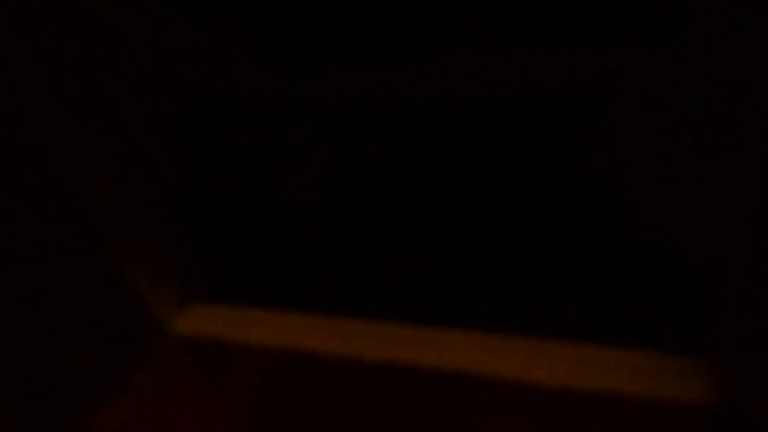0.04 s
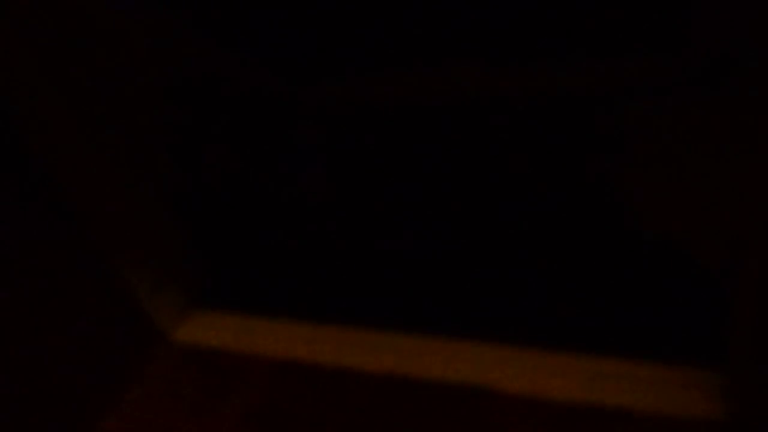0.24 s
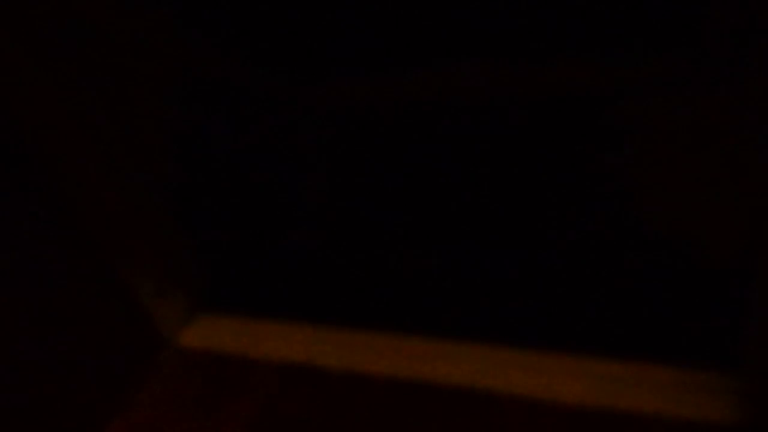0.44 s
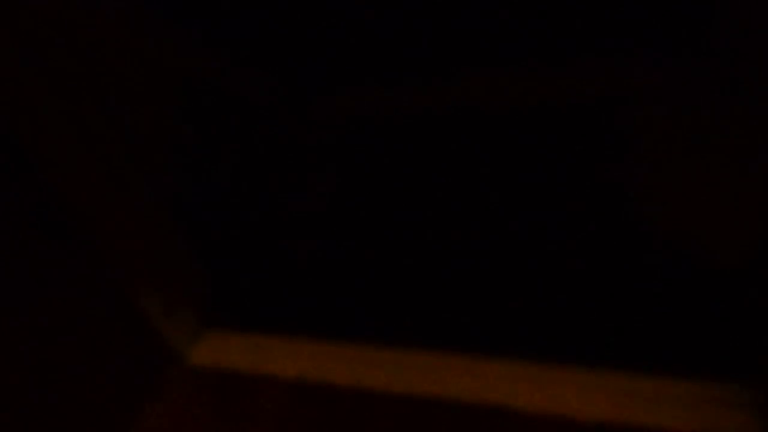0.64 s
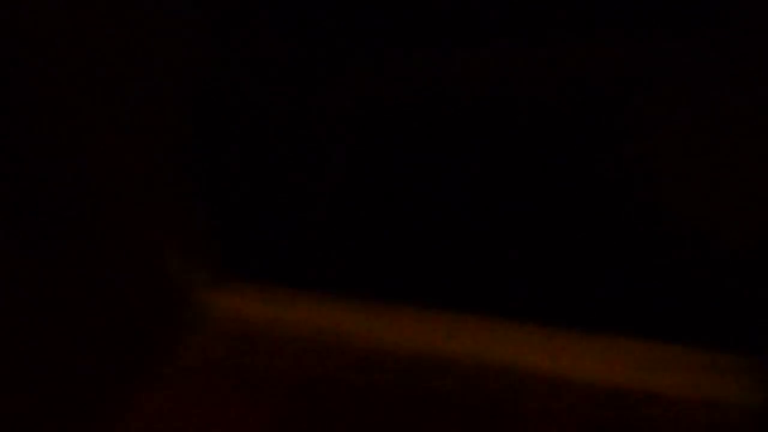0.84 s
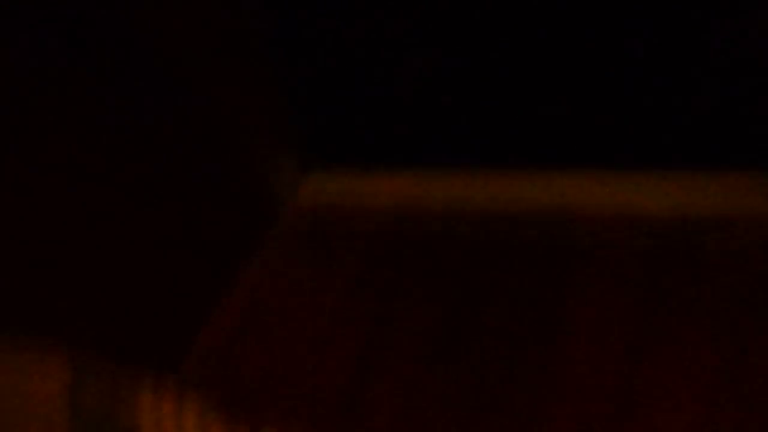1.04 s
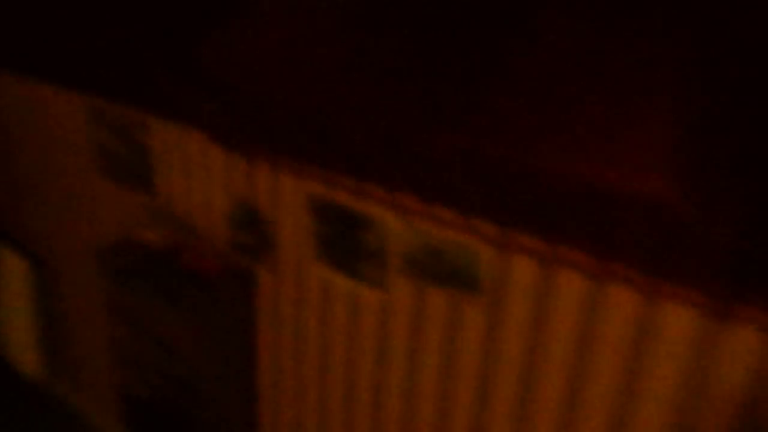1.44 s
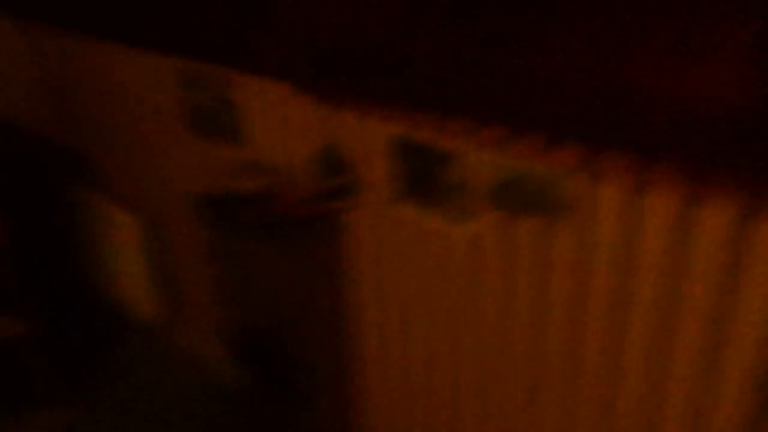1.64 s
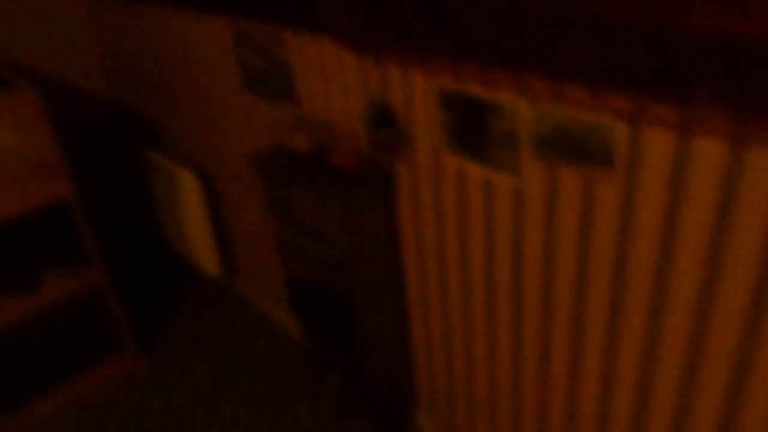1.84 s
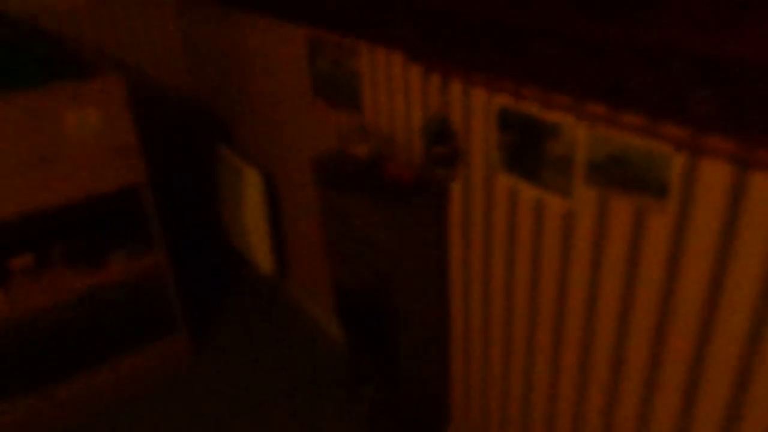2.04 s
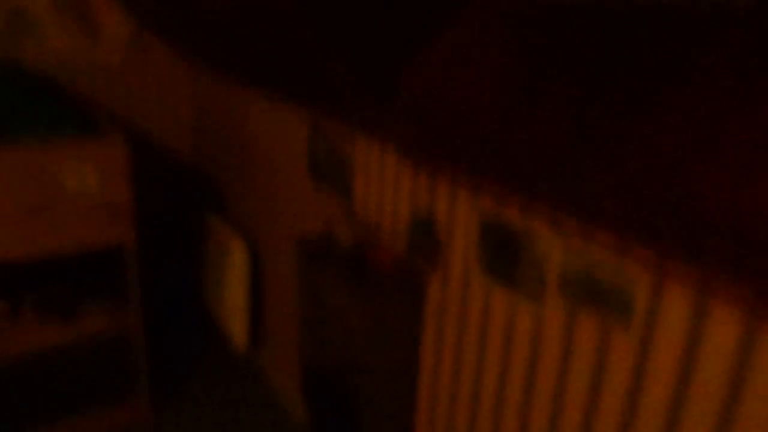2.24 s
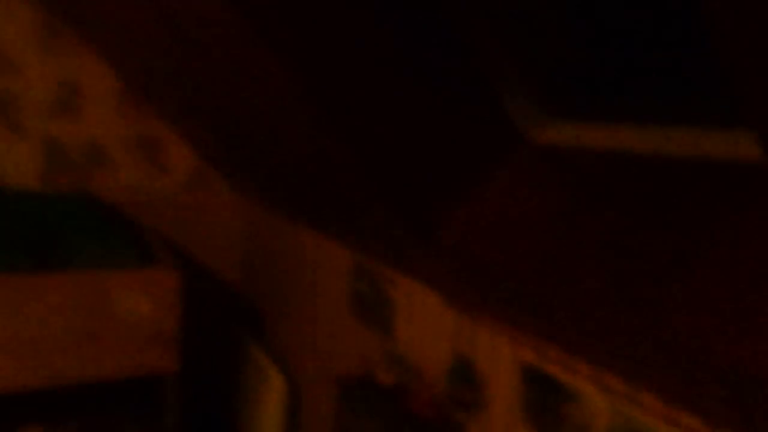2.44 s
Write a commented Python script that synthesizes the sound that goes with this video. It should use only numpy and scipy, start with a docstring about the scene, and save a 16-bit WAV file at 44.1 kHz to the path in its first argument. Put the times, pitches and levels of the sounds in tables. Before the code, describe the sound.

A window scrapes, rumbles and bangs shut, cutting off the hail and rain outside. In the small room a metal catch ticks, the wooden frame knocks, and soft handling thumps and three hollow clacks follow as the muffled storm swells.

```python
"""Hail and rain roar outside an open window: a bed of noise peppered with tiny damped pings.
The sash scrapes and rumbles as friction shakes it, then bangs shut; pane and small room ring out.
The storm drops to a hush, in which the metal catch ticks and the wooden frame knocks.
Soft handling thumps and three hollow clacks follow, with single hailstones standing out,
while the storm's noise swells again."""
import sys
import numpy as np
from scipy import signal
from scipy.fft import rfft, irfft, next_fast_len
from scipy.io import wavfile
from scipy.ndimage import uniform_filter1d, map_coordinates

SR = 44100
rng = np.random.default_rng(int(sys.argv[2]) if len(sys.argv) > 2 else 0)


def to_wav(s):
    """Save 16-bit WAV."""
    ch = np.atleast_2d(s).T  # columns
    pcm = np.round(np.clip(ch, -1, 1) * 32767)  # PCM
    wavfile.write(sys.argv[1], SR, pcm.astype(np.int16))


N = 110250
SHUT_S = 0.5792  # the sash hits home


def amp(db):
    """Decibels to gain."""
    return 10 ** (np.asarray(db) / 20)


def unit(x):
    """Scale to rms 1."""
    return x / np.sqrt(np.mean(x ** 2) + 1e-20)


def along(points, hz):
    """Read a (freq_hz, value) curve on a log frequency axis."""
    freqs, values = np.transpose(points)
    return np.interp(np.log(hz + 1), np.log(freqs + 1), values)


def fader(points):
    """Gain per sample from (time_s, level_db) points."""
    return amp(np.interp(np.arange(N) / SR, *np.transpose(points)))


def since(start_s):
    """Seconds since a moment, zero before it."""
    return np.maximum(np.arange(N) / SR - start_s, 0)


def strike(start_s, t60_s, rise_s=0.00044):
    """Envelope of a hit: quick attack, exponential decay."""
    t = since(start_s)
    return (1 - np.exp(-t / rise_s)) * amp(-60 * t / t60_s)


def filtered(x, response):
    """Filter x by a gain that depends on frequency."""
    size = next_fast_len(N + SR // 4)
    return irfft(rfft(x, size) * response(np.fft.rfftfreq(size, 1 / SR)), size)[:N]


def equalised(x, colour):
    """Shape x with a (freq_hz, gain_db) curve."""
    return filtered(x, lambda f: amp(along(colour, f)))


def noise(colour):
    """Coloured noise of rms 1."""
    return unit(equalised(rng.standard_normal(N), colour))


def ring(modes, start_s, rise_s, wander_hz=0):
    """Struck, decaying modes; any pitch wander roughens them."""
    out = np.zeros(N)
    for hz, db, t60_s in modes:
        envelope = amp(db + rng.normal(0, 1)) * strike(start_s, t60_s, rise_s)
        detune_hz = wander_hz * unit(uniform_filter1d(rng.standard_normal(N), size=200))
        cycles = hz * since(start_s) + np.cumsum(detune_hz) / SR + rng.random()
        out += envelope * np.sin(2 * np.pi * cycles)
    return out


# Decay of the small room: freq_hz, t60_s
ROOM_DECAY = [(100, 0.68), (300, .38), (1200, 0.41), (4000, 0.41), (8000, 0.31), (15000, 0.27)]


def in_room(x, wet_db):
    """Add the room's reflections, a noise tail that lasts longest in the bass."""
    hz, t, spectrum = signal.stft(rng.standard_normal(SR), SR, nperseg=256)
    decay = amp(-60 * t / along(ROOM_DECAY, hz)[:, None])
    tail = signal.istft(spectrum * decay, SR, nperseg=256)[1]
    tail *= 1 - np.exp(-np.arange(len(tail)) / SR / 0.0014)  # soft onset
    return x + amp(wet_db) * signal.fftconvolve(x, tail / np.linalg.norm(tail))[:N]


def tick(start_s, level_db, pitch_hz, half_width_hz, room_db):
    """A very short contact: one band of a noise burst, with its splash in the room."""
    envelope = strike(start_s, t60_s=0.0045)
    spectrum = rfft(envelope * rng.standard_normal(N))
    flattened = irfft(spectrum / np.hypot(np.abs(spectrum), np.abs(spectrum).mean() / 2), N)
    burst = filtered(flattened, lambda f: 1 / (1 + ((f - pitch_hz) / half_width_hz) ** 4))
    burst *= np.linalg.norm(envelope) / np.linalg.norm(burst)
    return in_room(amp(level_db) * burst, room_db)


# Room tone: freq_hz, gain_db
HUSH_COLOUR = [(30, -17), (150, -14.5), (600, -2), (2000, -10), (3000, -20), (4500, -20), (9000, -39),
               (15000, -62.5)]


def hush():
    """The room's faint, steady noise floor."""
    return amp(-67) * noise(HUSH_COLOUR)


# Roar of far rain: freq_hz, gain_db
RAIN_COLOUR = [(20, -30), (45, -19), (80, -11.5), (160, -2), (330, -2), (600, -1), (1100, -4), (2300, -9),
               (3000, -12.5), (5000, -19), (7200, -23), (8600, -28.5), (10300, -31), (12000, -35.5),
               (15500, -40)]


def rain(flurry_db=1.28, flurry_hz=750, flurry_s=0.05):
    """Far rain in flurries: the level drifts separately in each band."""
    hz, t, spectrum = signal.stft(noise(RAIN_COLOUR), SR, nperseg=512)
    grid = np.meshgrid(hz / flurry_hz, t / flurry_s, indexing="ij")
    flurries = map_coordinates(rng.standard_normal((256, 256)), grid, mode="mirror")
    return unit(signal.istft(spectrum * amp(flurry_db * flurries), SR, nperseg=512)[1][:N])


# Tone of the hail patter: freq_hz, gain_db
HAIL_COLOUR = [(20, -49), (150, -15.5), (400, 2), (7000, 1), (11000, -3), (15000, -21)]


def hail(per_s, centre_hz, ring_cycles=5.1, scatter_db=4, largest_db=16.5):
    """Stones of random size land at random, each ringing for a few damped cycles; rms 1."""
    when, size, pitch = rng.random((int(per_s * N / SR), 3)).T[:, :, None]
    hz = np.clip(centre_hz * np.sqrt(pitch / (1 - pitch)), 300, 10000)
    size_db = np.minimum(-scatter_db * np.log(1 - size), largest_db)
    t = np.arange(400) / SR
    pings = amp(size_db) * np.sin(2 * np.pi * hz * t) * amp(-60 * hz * t / ring_cycles)
    positions = (when * N).astype(int) + np.arange(len(t))
    patter = np.bincount(positions.ravel(), pings.ravel(), N)[:N]
    return unit(equalised(patter, HAIL_COLOUR))


# Fader ride of the storm as heard in the room: time_s, level_db
STORM_RIDE = [(0, -38), (.1, -35.5), (.25, -31.5), (.4, -30.5), (.5, -29.5), (.57, -30.5), (.66, -43),
              (.8, -65), (1.0, -70.5), (1.07, -65), (1.15, -67), (1.27, -59), (1.46, -55), (1.58, -59),
              (1.66, -55.5), (1.85, -53), (2.05, -49.5), (2.25, -47), (2.38, -43), (2.5, -44)]
# Close stones relative to the storm, lost in the hush: time_s, level_db
NEAR_HAIL_RIDE = [(.6, -20.5), (.75, -38), (1.7, -27), (2.1, -25)]
# Change of the storm's tone behind the shut window: freq_hz, gain_db
SHUT_COLOUR = [(80, -0.5), (300, 1), (600, -1), (1200, 1), (3500, -.5), (7500, 0.5), (10000, -0.5),
               (14000, -5)]


def storm(crossfade_s=0.1):
    """Rain, dense hail and a few near stones, quieter and a little duller once the window shuts."""
    dense = amp(-8.5) * hail(per_s=1800, centre_hz=1560)
    near = fader(NEAR_HAIL_RIDE) * hail(per_s=43, centre_hz=3900)
    outside = rain() + dense + near
    shut = np.minimum(since(SHUT_S) / crossfade_s, 1)
    return fader(STORM_RIDE) * ((1 - shut) * outside + shut * equalised(outside, SHUT_COLOUR))


# Spot hits of hail: start_s, level_db, pitch_hz, half_width_hz, room_db
HAILSTONE_HITS = [(1.098, -49, 2446, 499, 1), (1.478, -34, 1294, 702, -4), (1.649, -37.5, 1480, 700, 4),
                  (1.791, -39, 4000, 1200, -4), (1.937, -39, 4200, 700, -5.5), (2.088, -35, 4280, 707, -3),
                  (2.105, -47, 9400, 3000, -6), (2.181, -44, 9500, 2800, 2), (2.378, -38, 9000, 2000, -9)]


def hailstones():
    """Single stones strike sharply enough to stand out from the storm."""
    return sum(tick(*hit) for hit in HAILSTONE_HITS)


# Soft handling thumps: start_s, level_db
HAND_THUMPS = [(1.705, -48.5), (1.722, -28), (1.738, -32), (1.775, -34), (1.808, -33), (1.836, -32.5),
               (1.86, -35), (1.873, -35), (1.907, -36.5), (2.222, -33)]
# Fader ride of the hand's rumble: time_s, level_db
RUB_RIDE = [(1.12, -79.5), (1.19, -67), (1.33, -79), (1.47, -68), (1.55, -60.5), (1.62, -72), (1.69, -59),
            (1.725, -38), (1.76, -63.5), (1.81, -53), (1.87, -52), (1.93, -59), (2.04, -65), (2.1, -43),
            (2.15, -48.5), (2.23, -52.5), (2.3, -54.5), (2.5, -50.5)]
# Tone of that rumble: freq_hz, gain_db
RUB_COLOUR = [(20, -18.5), (50, -3), (110, -1.5), (210, 4), (330, -2), (600, -31), (1500, -48), (5000, -68)]


def handling(thump_hz=102.5):
    """A hand shifts on the microphone's body: a rolling rumble with soft low bumps in it."""
    pitches = thump_hz * np.exp(0.2 * rng.standard_normal(len(HAND_THUMPS)))
    bumps = np.zeros(N)
    for (s, db), hz in zip(HAND_THUMPS, pitches):
        envelope = amp(db) * strike(s, t60_s=0.028, rise_s=0.0017)
        bumps += envelope * 2 * np.cos(2 * np.pi * hz * since(s))
    return bumps + fader(RUB_RIDE) * noise(RUB_COLOUR)


# Three clacks, top note and grit relative to each: start_s, level_db, top_hz, top_db, grit_db
CLACK_HITS = [(1.9355, -33, 1990, -3.5, -6.5), (2.0267, -36, 1943, 1, -4), (2.1625, -36.5, 2185, 2, -5.5)]
# Their hollow body: pitch_hz, level_db, t60_s
CLACK_MODES = [(837, -14.5, 0.12), (980, -8, 0.08), (1319, -5, 0.05), (4190, -18, 0.044)]
# Tone of their grit: freq_hz, gain_db
GRIT_COLOUR = [(300, -34), (900, -3.5), (2100, -7), (2700, -19), (4600, -15), (6000, -21), (15000, -38)]


def clacks(t60_s=0.05, rise_s=0.0008):
    """Light hollow contacts: a shared body, a top note of their own and some grit."""
    taps, grit_envelope = np.zeros((2, N))
    for s, db, top_hz, top_db, grit_db in CLACK_HITS:
        taps += amp(db) * ring(CLACK_MODES + [(top_hz, top_db, t60_s)], s, rise_s)
        grit_envelope += amp(db + grit_db) * strike(s, t60_s, rise_s)
    return taps + grit_envelope * noise(GRIT_COLOUR)


# Chatter of contacts within the knock: start_s, level_db
KNOCK_HITS = [(1.335, -34.5), (1.338, -28), (1.344, -34), (1.3494, -35.5), (1.364, -40.5)]
# Tone of the thud: freq_hz, gain_db
THUD_COLOUR = [(60, -30), (300, -12), (700, -22), (1050, 5.5), (1450, 3.5), (2200, -12.5), (4200, -16),
               (6000, -23), (15000, -49)]
# Ring of the wood: pitch_hz, level_db, t60_s
WOOD_MODES = [(125.9, -14.5, 0.38), (225, -13, 0.22), (373, -3.5, 0.18), (629, -7, 0.15), (962, 0.5, 0.15),
              (1045, 5, 0.049), (1390, 0.5, 0.05), (2000, -7, 0.044), (2410, -13, .08)]


def frame_knock():
    """A dull, rattling blow on the wooden frame: every contact rings it anew."""
    thud = sum(amp(db) * strike(s, t60_s=0.023) for s, db in KNOCK_HITS) * noise(THUD_COLOUR)
    wood = sum(amp(db) * ring(WOOD_MODES, s, rise_s=0.00046, wander_hz=30.7) for s, db in KNOCK_HITS)
    return amp(-3) * thud + amp(-7.5) * wood


# Bright ticks of the moving sash, the bang and the catch: start_s, level_db, pitch_hz, half_width_hz, room_db
BRIGHT_TICKS = [(.3885, -26, 11000, 3500, -3), (.4108, -7, 2600, 2050, -26), (0.5794, -1.5, 3950, 1240, -29),
                (0.5784, -8, 9800, 2100, -26), (0.5828, -10, 3700, 1700, -29),
                (.6622, -36.5, 11500, 1514, -15), (.9245, -34.5, 3514, 350, -5.5),
                (0.9249, -36, 3900, 2400, 1), (0.937, -44.5, 6000, 4470, -6)]


def bright_ticks():
    """Bright ticks as the sash moves and in the crack as it bangs home; the metal catch ticks in the hush
    after."""
    return sum(tick(*hit) for hit in BRIGHT_TICKS)


# Brief scrapes and rustles: start_s, length_s, level_db
SCRAPE_STROKES = [(0.134, 0.012, -41), (0.154, 0.015, -39.5), (0.209, 0.059, -45.5), (0.278, 0.012, -41.5),
                  (0.389, 0.011, -36), (0.493, 0.011, -45), (0.646, 0.014, -50), (0.679, 0.0086, -60),
                  (1.18, .012, -68), (1.266, .035, -65.5), (1.409, 0.044, -56), (1.486, 0.026, -62.5),
                  (2.024, 0.014, -52.5), (2.084, 0.0088, -55)]
# Their hiss: freq_hz, gain_db
SCRAPE_COLOUR = [(300, -26), (1500, -8), (3500, 6), (5200, -2), (7200, 4), (9000, -7.5), (11500, -19),
                 (15000, -22.5)]


def scrapes():
    """Short hissing strokes, each swelling and falling in one arch."""
    envelope = np.zeros(N)
    for s, length_s, db in SCRAPE_STROKES:
        progress = np.minimum(since(s) / length_s, 1)
        envelope += amp(db) * np.sqrt(np.abs(np.sin(np.pi * progress)))
    return envelope * noise(SCRAPE_COLOUR)


# Fader ride of the sash running in its frame: time_s, level_db
SASH_RIDE = [(.3, -70.5), (.408, -38.5), (.413, -26), (.423, -25.5), (.432, -25), (.467, -27),
             (.485, -33.5), (.502, -23.5), (.53, -36.5), (.575, -36), (.6, -61.5)]
# Low resonances of the sash: pitch_hz, width_hz, level_db
SASH_RESONANCES = [(124, 8.3, 1), (160.7, 14, 6), (337, 64, -0.5), (464, 72, -1.5)]


def sash_rumble():
    """Friction shakes the moving sash at its low resonances."""
    def body(f):
        """Band-pass peaks, summed in alternating polarity."""
        return sum((-1) ** k * amp(db) * 1j * f * width / (hz * hz - f * f + 1j * f * width)
                   for k, (hz, width, db) in enumerate(SASH_RESONANCES))

    t = np.arange(N) / SR
    moving = (t > SASH_RIDE[0][0]) & (t < SASH_RIDE[-1][0])
    return fader(SASH_RIDE) * moving * unit(filtered(rng.standard_normal(N), body))


# Contacts of sash on frame: start_s, level_db
BANG_HITS = [(0.5792, -9), (0.58, -8), (0.583, -16.5), (0.5914, -13.5)]
# Tone of the crack: freq_hz, gain_db
CRACK_COLOUR = [(30, -11.5), (120, -8), (300, -7), (500, 3.5), (750, 3), (1200, -7.5), (1800, -2.5),
                (2700, -13), (4400, -10), (5700, -26), (9000, -33.5), (12000, -42.5), (15000, -43.5)]
# Ring of pane and frame: pitch_hz, level_db, t60_s
PANE_MODES = [(151.6, -20, 0.64), (335, -5.5, 0.14), (368.4, -6.5, 0.28), (472, -2.5, .19),
              (543, -0.5, 0.23), (646, 0.5, 0.13), (716, -1.5, .17), (793, 2, 0.15), (958, -10, .2),
              (1070, 3, 0.1), (1278, 0.5, 0.11), (1694, 4, 0.075), (2060, -10.5, .08), (2317, -9, 0.082)]


def sash_bang():
    """The sash hits home in a quick chatter of contacts and the pane rings."""
    envelope = sum(amp(db) * strike(s, t60_s=0.021) for s, db in BANG_HITS)
    crack = envelope * noise(CRACK_COLOUR)
    crack *= np.linalg.norm(envelope) / np.linalg.norm(crack)
    pane = ring(PANE_MODES, SHUT_S, rise_s=0.00074, wander_hz=12)
    return crack + amp(-20) * pane


def scene():
    """Mono mix of the window, the small noises in the room and the storm."""
    slam = in_room(sash_bang(), wet_db=-16.5) + bright_ticks()
    woodwork = in_room(sash_rumble() + scrapes() + frame_knock(), wet_db=-9)
    small_noises = in_room(clacks(), wet_db=-6.5) + handling()
    background = storm() + hush() + hailstones()
    return (slam + woodwork + small_noises + background)[None]


def record(dry):
    """Round off the peaks, cut one narrow notch and limit the treble."""
    ceiling, notch_hz, notch_width_hz, top_hz = 0.66, 8020, 73, 15850
    rounded = dry[0] / (1 + np.abs(dry[0] / ceiling) ** 6) ** (1 / 6)
    notch = lambda f: (notch_hz ** 2 - f * f) / (notch_hz ** 2 - f * f + 2j * f * notch_width_hz)
    return filtered(rounded, lambda f: notch(f) * (f < top_hz))[None]


dry = scene()
out = record(dry)
to_wav(out)
```